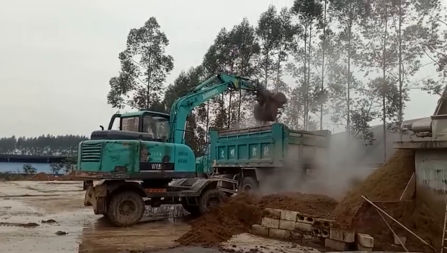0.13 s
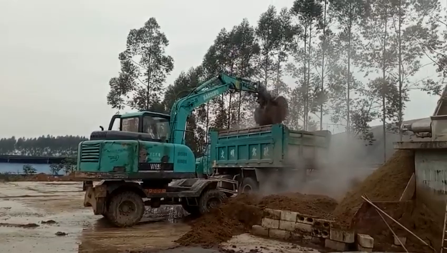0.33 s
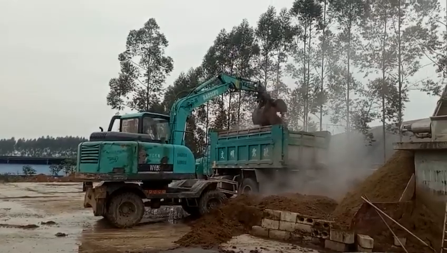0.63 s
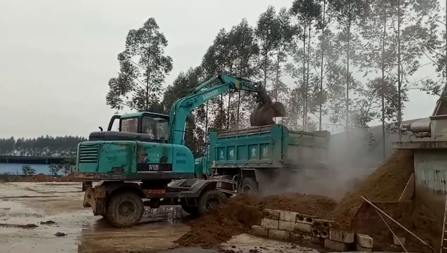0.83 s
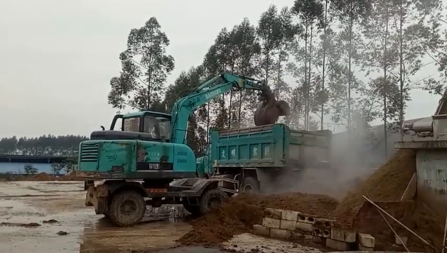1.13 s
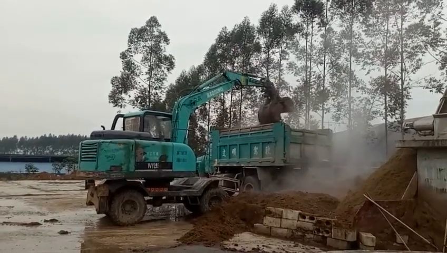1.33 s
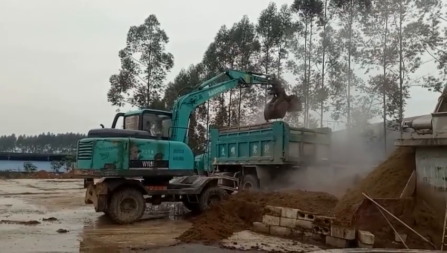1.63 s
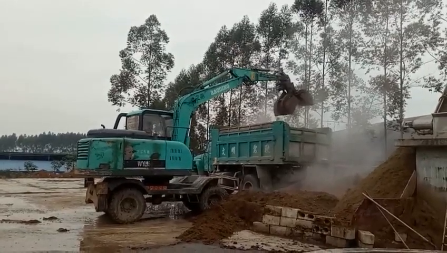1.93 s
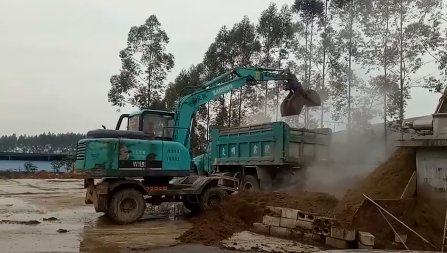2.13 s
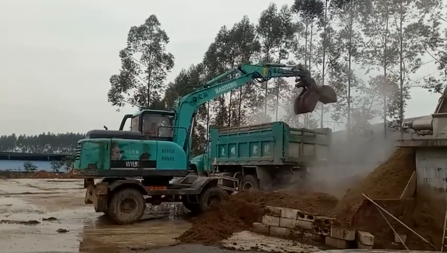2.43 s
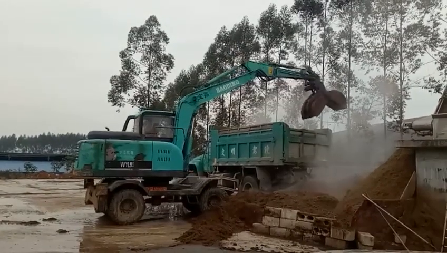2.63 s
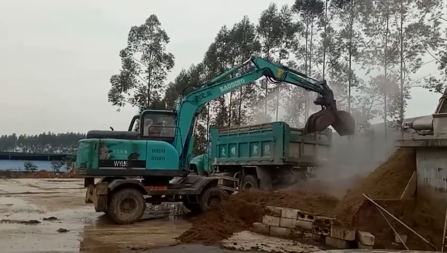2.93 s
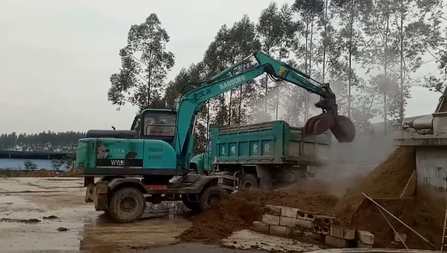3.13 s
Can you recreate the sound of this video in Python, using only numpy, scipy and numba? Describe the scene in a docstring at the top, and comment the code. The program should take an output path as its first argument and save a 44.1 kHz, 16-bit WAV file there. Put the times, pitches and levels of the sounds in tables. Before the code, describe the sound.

Excavator diesel engine drones and knocks steadily close by, with hydraulic whine and a few clanks

```python
"""An outdoor yard, where a wheeled excavator works close by, louder in the left channel.
Its four-cylinder diesel drones, chugs and knocks: steady lines, a ringing silencer and blows on the block.
The pump's whine gains overtones and the engine speed sags while the boom lifts; the cooling fan hums.
Shaped noise makes the exhaust rumble and the rush of air; the steel grab clanks as ringing cracks."""
import sys
import numpy as np
from scipy import signal
from scipy.fft import rfft, irfft
from scipy.io import wavfile
from scipy.ndimage import uniform_filter1d, map_coordinates
from numba import njit

SR = 44100
rng = np.random.default_rng(int(sys.argv[2]) if len(sys.argv) > 2 else 0)


def bounce(signal):
    """Save signal as a 16-bit WAV file at the path given by the first command-line argument."""
    frames = np.transpose(np.atleast_2d(signal))
    limited = np.clip(frames, -1, 1)
    pcm = np.round(limited * 32767).astype(np.int16)
    wavfile.write(sys.argv[1], SR, pcm)


N = 145530
T = np.arange(N) / SR
FREQS = np.maximum(np.fft.rfftfreq(N, 1 / SR), 1)

# Crankshaft speed. Each row: time in seconds, speed in turns per second, before a slight waver.
CRANK_SPEED = [(0, 25.9), (.21, 26.1), (.32, 24.95), (.5, 24.42), (1.05, 24.28), (2.03, 24.36),
               (2.16, 25.6), (2.7, 25.88), (2.86, 25.4), (3.05, 26.2), (3.3, 26.1)]
SPEED_WAVER = 0.001918  # spread, as a share of the speed
# Hydraulic load. Each row: time in seconds, load as a share from 0 to 1.
HYDRAULIC_LOAD = [(0, 0.35), (.24, 0.06), (.36, 1), (1.4, 0.93), (2.06, 0.53), (2.18, 0.05), (3.3, 0)]

# Lines of the engine drone. Each entry: frequency as a multiple of the crankshaft speed.
DRONE_MULTIPLES = [2, 4, 4.5, 5, 6, 6.5, 8, 10, 10.5, 13, 15, 16, 24, 30, 40, 44, 46, 48, 63.5]
# Mean level of each of those lines. Each row: level in dB under full load, level in dB running free.
DRONE_LEVELS = [(-49, -65), (-38.5, -40.5), (-40, -42), (-42, -42), (-46, -42), (-40, -48), (-47, -34),
                (-54, -38.5), (-45.5, -47), (-44, -42.5), (-51, -42.5), (-46, -43), (-44.5, -47),
                (-45.5, -45.5), (-39.5, -44), (-49, -38.5), (-37.5, -44), (-45, -38.5), (-58, -37)]
DRONE_WAVER_DB = 2.8

# Level of the silencer's chug. Each row: time in seconds, level in dB.
CHUG_LEVEL = [(0, -48), (.35, -38.5), (.9, -36.5), (1.3, -32.5), (1.7, -31.5), (2.05, -35), (2.25, -34),
              (2.8, -36.5), (3.3, -44)]
SILENCER_HZ, SILENCER_HALF_WIDTH_HZ = 298, 14
CHUG_PLACE = .54  # place of the puff in the two-turn engine cycle (0-1)

# Mean levels of the pump whine. Each row: time in seconds, then first, second and third partial in dB.
PUMP_PARTIAL_LEVELS = [(0, -33, -63, -70), (.26, -32, -56, -69), (.35, -36, -35, -35),
                       (.52, -31.5, -43, -32), (.7, -33, -37, -33.5), (1.0, -30.5, -49, -29),
                       (1.3, -29.5, -61, -39), (1.55, -32, -46, -31), (1.8, -33, -38, -37),
                       (2.06, -34, -33, -33.5), (2.18, -35, -52, -72), (2.62, -26.5, -52, -61),
                       (2.82, -56, -50, -59), (3.15, -30, -58, -61), (3.3, -28.5, -54, -65)]
PISTONS, PUMP_WAVER_DB = 9, 1.73
# Mean level of the fan's hum. Each row: time in seconds, level in dB.
FAN_HUM_LEVEL = [(0, -35), (.22, -43), (.35, -28), (.6, -36.5), (1.45, -31.5), (2.0, -33.5), (2.27, -26.5),
                 (2.6, -30), (3.05, -28.5), (3.3, -35)]
FAN_PER_TURN, FAN_WAVER_DB = 5.16, 2  # hum cycles per crankshaft turn

# Spectrum of the exhaust rumble. Each row: frequency in Hz, base level in dB per Hz.
RUMBLE_SPECTRUM = [(22, -61), (36, -85), (55, -56.5), (78, -61.5), (105, -45.5), (135, -52.5), (165, -54.5),
                   (245, -53.5), (300, -55.5), (400, -58), (520, -58.5), (620, -56.5), (900, -64),
                   (1500, -100)]
RUMBLE_PULSE, RUMBLE_SURGE_DB, RUMBLE_FREE_DB = 0.2, 1.23, -0.1  # throb depth, surge spread, free offset
# strength of the repeating part against fresh noise, under load and running free
RUMBLE_REPEAT, RUMBLE_REPEAT_FREE = 0.69, 0.32

# Spectrum of the engine bay's rush and clatter. Each row: frequency in Hz, base level in dB per Hz.
RUSH_SPECTRUM = [(150, -65), (400, -68), (700, -64), (1100, -56), (1700, -58.5), (2300, -60), (3100, -66.5),
                 (4500, -63.5), (5300, -74), (6800, -83.5), (8000, -105), (11000, -107), (13700, -101),
                 (15500, -107)]
# Swell of the rush. Each row: time in seconds, offset in dB from that spectrum.
RUSH_OFFSET = [(0, 1), (.2, 1), (.5, 1), (1.2, 0.5), (2.0, 1), (2.55, 0), (2.85, 0.5), (3.3, 0.5)]
RUSH_PULSE, RUSH_REPEAT = 0.11, 0.36  # pulse depth, repeating part against fresh noise
RUSH_FLICKER_DB = .5
# share of the noise power that arrives scattered, unlike at the two microphones (0-1)
RUMBLE_DIFFUSE, RUSH_DIFFUSE = 0.035, 0.69

# Combustion knock of each cylinder. Each row: relative level in dB, delay as a share of the firing interval.
CYLINDER_KNOCKS = [(-5, 0), (-1, .19), (0, .09), (1, .22)]
# Engine block resonances. Each row: frequency in Hz, half-width in Hz, relative level in dB.
BLOCK_MODES = [(754, 120, -11), (1031, 85, -5.5), (1120, 56, 1), (1190, 126, -8.5), (1664, 170, -8),
               (2010, 300, -16.5)]
# Level of the knock, before its low-pass. Each row: time in seconds, level in dB.
KNOCK_LEVEL = [(0, -36), (.17, -26), (.25, -34), (.7, -28.5), (1.4, -28), (1.55, -30.5), (2.0, -33),
               (2.25, -30.5), (3.0, -29.5), (3.3, -34)]
KNOCK_SCATTER_DB, KNOCK_JITTER_S, KNOCK_TOP_HZ = 1, .00007, 3070
# share of the block's sound power that comes as distinct blows, under load and running free (0-1)
BLOW_SHARE, BLOW_SHARE_FREE = .62, .3

# Clanks of the grab. Each row: start in seconds, relative level in dB, contact decay time constant
# in seconds, frequency in Hz where the contact drives hardest.
GRAB_CLANKS = [(0.1873, -10.5, 0.0022, 4350), (0.1946, -16, 0.005, 3800), (0.238, -22, 0.006, 3500),
               (0.2492, -19, 0.005, 2520), (.274, -26, 0.0028, 3600), (0.2804, -24.5, 0.0036, 3600),
               (0.356, -29, 0.011, 3500), (2.779, -19, 0.005, 3400), (2.7935, -23, 0.0022, 4200),
               (2.839, -23.5, 0.012, 4680), (2.8395, -20.5, 0.0049, 1200), (2.857, -24, 0.013, 1000)]
# Modes of the steel grab. Each row: frequency in Hz, relative level in dB before the contact's tilt.
GRAB_MODES = [(760, 5), (940, 7.5), (1630, 1), (2250, 3.5), (2500, -3), (3480, -0.5), (3811, -1),
              (4300, 0.5), (4650, -1.5), (5300, -6)]
CONTACT_DB_PER_OCTAVE, CRACK_HALF_WIDTH_HZ = 6, 195
RING_DB, RING_T60_S = -9, .08  # ring relative to the crack, time to fall 60 dB
YARD_DB, YARD_DECAY_S, GRAB_TOP_HZ = -20.5, 0.03, 5550

# how much louder the left side is, and how much later the right side hears
LEFT_BASS_DB, LEFT_TREBLE_DB, MIC_LAG_S = 7, 6, 0.00015
GRAB_LEFT_DB, GRAB_LAG_S = 10.5, .00005

LIMIT_DB, LIMIT_ATTACK_S, LIMIT_RELEASE_S = -14, 0.0017, 0.1
TOP_HZ, FADE_S = 15200, .004


def undb(db):
    """Turn decibels into gain."""
    return 10 ** (np.asarray(db) / 20)


def unit(x):
    """Scale a sound to a standard deviation of 1."""
    return x / np.std(x)


def curve(rows):
    """Join (seconds, value) rows by straight lines."""
    return np.interp(T, *np.array(rows).T)


def by_load(loaded, free):
    """Slide a setting between its free and loaded values with the hydraulic load."""
    return free + (loaded - free) * curve(HYDRAULIC_LOAD)


def across(rows):
    """Join (Hz, value) rows on a log-frequency axis."""
    hz, values = np.array(rows).T
    return np.interp(np.log(FREQS), np.log(hz), values)


def colour(x, rows):
    """Give a white sound a spectrum in dB per Hz."""
    spectrum = rfft(unit(x)) * undb(across(rows))
    return irfft(spectrum * np.sqrt(SR / 2), N)


def ring(x, modes):
    """Excite steep resonances: each (Hz, half-width, dB) band-pass is applied twice."""
    body = 0
    for hz, half_width, db in modes:
        detune = (FREQS ** 2 - hz * hz) / (2 * half_width * FREQS)
        body = body + undb(db) / (1 + 1j * detune) ** 2
    return irfft(rfft(x) * body, N)


def dull(x, top_hz):
    """Take off the treble with a steep low-pass."""
    return signal.sosfilt(signal.butter(8, top_hz, fs=SR, output="sos"), x)


def walk(rate):
    """Smooth random drift of spread near 1, with about `rate` fresh values a second."""
    hold = max(int(SR / rate), 2)
    steps = np.repeat(rng.standard_normal(N // hold + 2), hold)
    smooth = uniform_filter1d(uniform_filter1d(steps, hold), hold)
    return unit(smooth[:N])


def repeating(turns):
    """A random rattle that comes back every two turns of the crankshaft."""
    loop = rng.standard_normal(3600)
    place = turns / 2 % 1 * len(loop)
    return unit(map_coordinates(loop, [place], mode="grid-wrap"))


def tone(phase, db, waver_db):
    """A sine line whose level wavers around an rms level in dB."""
    level = np.sqrt(2) * undb(db + waver_db * walk(7.0))
    return level * np.sin(2 * np.pi * (phase + rng.random()))


def microphones(x, left_db, lag_s):
    """The sound reaches the left microphone first and louder."""
    late = map_coordinates(x, [np.arange(N) - lag_s * SR], mode="mirror")
    return np.array([x, late]) * undb(np.array([[left_db], [-left_db]]) / 2)


def spread(source, turns, share, left_db):
    """A noise heard partly straight and partly scattered from the yard, unlike on each side."""
    side_gain = undb(np.array([[left_db], [-left_db]]) / 2 - 0.5)
    scattered = np.array([source(turns), source(turns)]) * side_gain
    straight = microphones(source(turns), left_db, MIC_LAG_S)
    return np.sqrt(1 - share) * straight + np.sqrt(share) * scattered


def drone(turns):
    """Lines of the firing cycle; neighbours half a multiple apart beat once in two turns."""
    lines = zip(DRONE_MULTIPLES, DRONE_LEVELS)
    return sum(tone(k * turns, by_load(*levels), DRONE_WAVER_DB) for k, levels in lines)


def chug(turns):
    """One exhaust puff in each two-turn engine cycle rings the silencer."""
    times = np.interp(np.arange(int(turns[-1] / 2)) + CHUG_PLACE, turns / 2, T)
    puffs = np.zeros(N)
    puffs[(times * SR).astype(int)] = 1
    silencer = [(SILENCER_HZ, SILENCER_HALF_WIDTH_HZ, 0)]
    return unit(ring(puffs, silencer)) * undb(curve(CHUG_LEVEL))


def pump(turns):
    """Piston strokes whine at nine per turn, with two overtones."""
    times, *partials = np.array(PUMP_PARTIAL_LEVELS).T
    whine = 0
    for number, levels in enumerate(partials, start=1):
        whine = whine + tone(number * PISTONS * turns, np.interp(T, times, levels), PUMP_WAVER_DB)
    return whine


def fan(turns):
    """The belt-driven cooling fan hums in proportion to crankshaft speed."""
    return tone(FAN_PER_TURN * turns, curve(FAN_HUM_LEVEL), FAN_WAVER_DB)


def rumble(turns):
    """Exhaust noise throbs with each firing, surges unevenly and repeats more exactly under load."""
    throb = 1 + RUMBLE_PULSE * np.cos(2 * np.pi * 2 * turns)  # two firings per turn
    surge = undb(RUMBLE_SURGE_DB * walk(16))
    repeat = by_load(RUMBLE_REPEAT, RUMBLE_REPEAT_FREE)
    gas = (rng.standard_normal(N) + repeat * repeating(turns)) / np.hypot(1, repeat)
    return colour(gas * throb * surge, RUMBLE_SPECTRUM) * undb(by_load(0, RUMBLE_FREE_DB))


def rush(turns):
    """Cooling air and valve clatter, as noise pulsing lightly at the firing rate."""
    air = rng.standard_normal(N) + RUSH_REPEAT * repeating(turns)
    pulse = 1 + RUSH_PULSE * np.cos(2 * np.pi * 2 * turns)
    level_db = curve(RUSH_OFFSET) + RUSH_FLICKER_DB * walk(24.74)
    return colour(air * pulse, RUSH_SPECTRUM) * undb(level_db)


def knock(turns):
    """Cylinders strike the block in turn, each with its own strength; the block also shakes steadily."""
    firing = np.arange(int(2 * turns[-1]) - 1)
    strength_db, late = np.array(CYLINDER_KNOCKS)[firing % len(CYLINDER_KNOCKS)].T
    jitter = KNOCK_JITTER_S * rng.standard_normal(len(firing))
    scatter_db = KNOCK_SCATTER_DB * rng.standard_normal(len(firing))
    times = np.interp(firing + late, 2 * turns, T) + jitter
    blows = np.zeros(N)
    blows[np.clip((times * SR).astype(int), 0, N - 1)] = undb(strength_db + scatter_db)
    struck = unit(ring(blows, BLOCK_MODES))
    shaking = unit(ring(rng.standard_normal(N), BLOCK_MODES))
    share = by_load(BLOW_SHARE, BLOW_SHARE_FREE)
    return (np.sqrt(share) * struck + np.sqrt(1 - share) * shaking) * undb(curve(KNOCK_LEVEL))


def grab():
    """Each contact cracks briefly and leaves the steel jaws ringing; the yard adds a short tail."""
    out = np.zeros(N)
    for start, db, decay, drive_hz in GRAB_CLANKS:
        age, struck = np.maximum(T - start, 0), T >= start
        tail = undb(YARD_DB) * np.exp(-age / YARD_DECAY_S)
        contact = struck * (np.exp(-age / decay) + tail)
        # modes sound weaker the further they lie from the driving frequency
        modes = [(hz, CRACK_HALF_WIDTH_HZ, gain_db - CONTACT_DB_PER_OCTAVE * abs(np.log2(hz / drive_hz)))
                 for hz, gain_db in GRAB_MODES]
        crack = unit(ring(contact * rng.standard_normal(N), modes)) * np.std(contact)
        steel = unit(sum(undb(g) * np.sin(2 * np.pi * (hz * age + rng.random())) for hz, _, g in modes))
        fall = struck * np.exp(-np.log(1000) * age / RING_T60_S)
        out += undb(db) * (crack + undb(RING_DB) * steel * fall)
    return out


def scene():
    """One crankshaft drives engine, pump and fan; the grab clanks with a stronger lean to the left."""
    speed = curve(CRANK_SPEED) * (1 + SPEED_WAVER * walk(12))
    turns = np.cumsum(speed) / SR
    hum = microphones(drone(turns) + chug(turns) + pump(turns) + fan(turns), LEFT_BASS_DB, MIC_LAG_S)
    exhaust = spread(rumble, turns, RUMBLE_DIFFUSE, LEFT_BASS_DB)
    air = spread(rush, turns, RUSH_DIFFUSE, LEFT_TREBLE_DB)
    knocks = microphones(dull(knock(turns), KNOCK_TOP_HZ), LEFT_TREBLE_DB, MIC_LAG_S)
    clanks = microphones(dull(grab(), GRAB_TOP_HZ), GRAB_LEFT_DB, GRAB_LAG_S)
    return hum + exhaust + air + knocks + clanks


@njit
def follow(x, attack, release):
    """Envelope that rises fast and falls slowly."""
    out, level = np.empty(len(x)), 0.
    for i in range(len(x)):
        level += (x[i] - level) * (attack if x[i] > level else release)
        out[i] = level
    return out


def record(dry):
    """The phone ducks both sides together on loud peaks and cuts the top; the ends fade briefly."""
    loudness = np.abs(dry).mean(axis=0)
    envelope = follow(loudness, 1 / (LIMIT_ATTACK_S * SR), 1 / (LIMIT_RELEASE_S * SR))
    gain = uniform_filter1d(1 / np.maximum(envelope / undb(LIMIT_DB), 1), size=128)
    fade = np.minimum(np.minimum(T, T[-1] - T) / FADE_S, 1)
    top_cut = signal.ellip(10, .2, 80, TOP_HZ, fs=SR, output="sos")
    return signal.sosfilt(top_cut, dry * gain * fade)


dry = scene()
out = record(dry)
bounce(out)
```